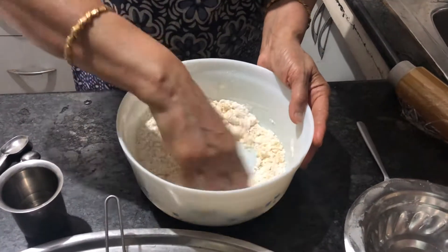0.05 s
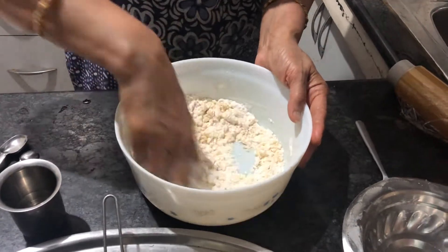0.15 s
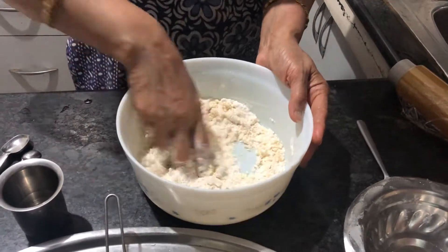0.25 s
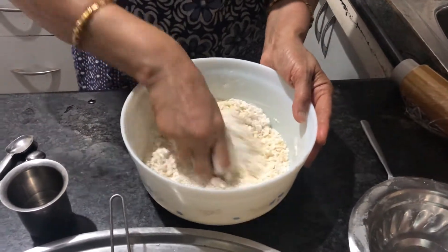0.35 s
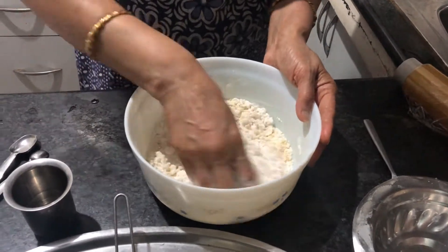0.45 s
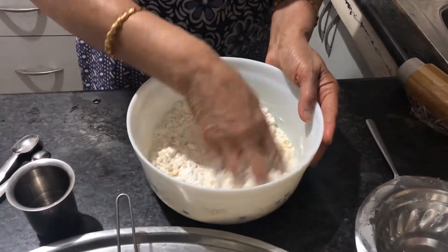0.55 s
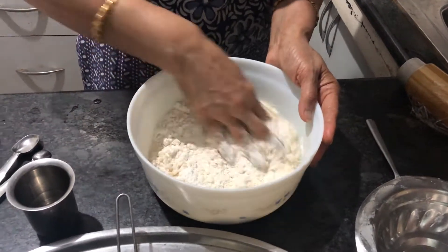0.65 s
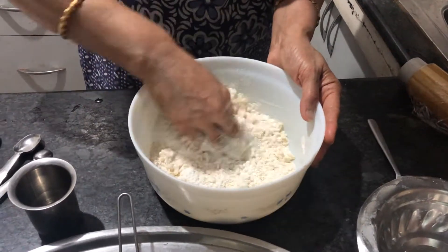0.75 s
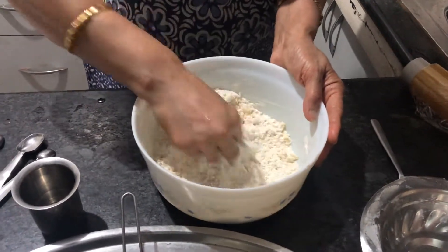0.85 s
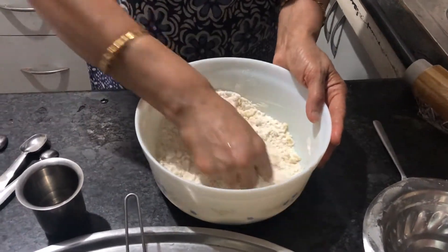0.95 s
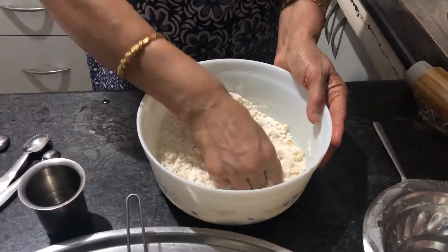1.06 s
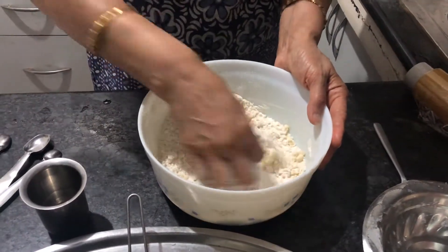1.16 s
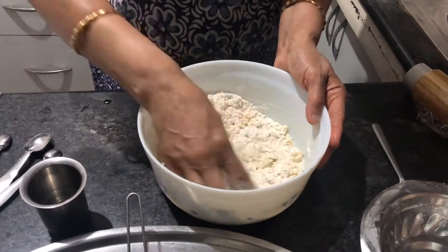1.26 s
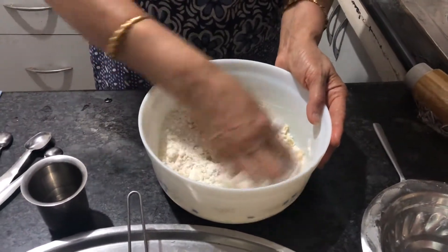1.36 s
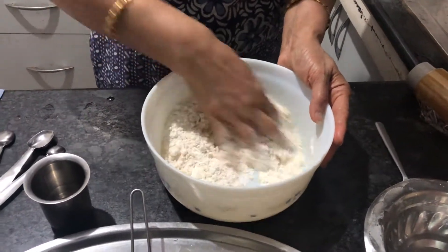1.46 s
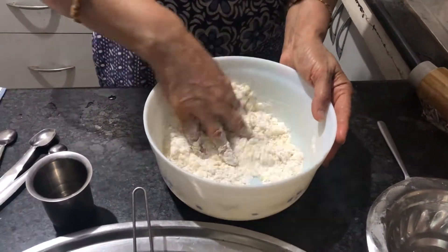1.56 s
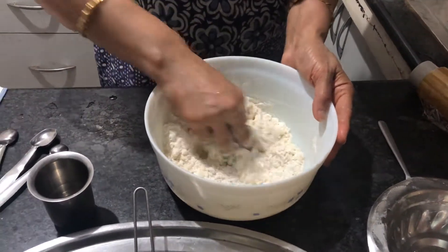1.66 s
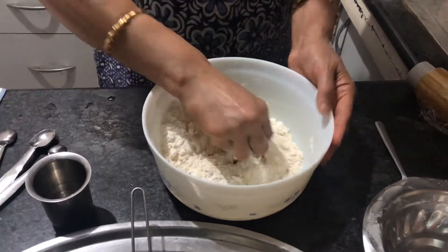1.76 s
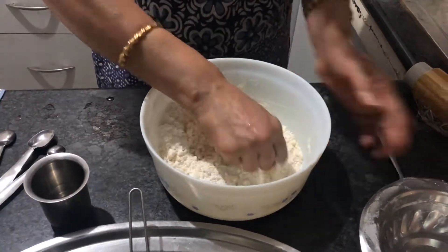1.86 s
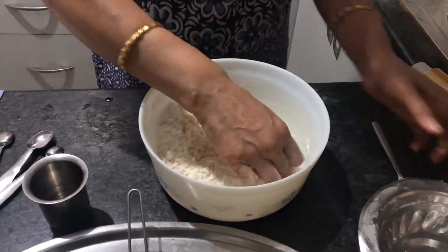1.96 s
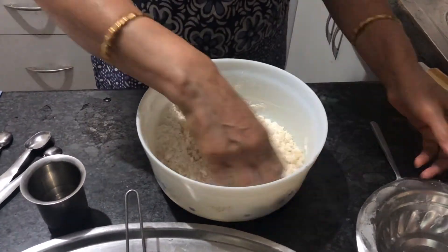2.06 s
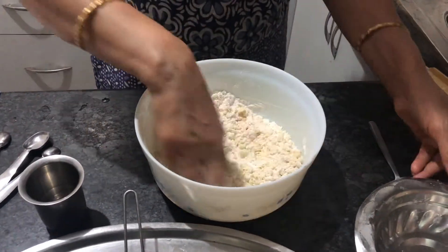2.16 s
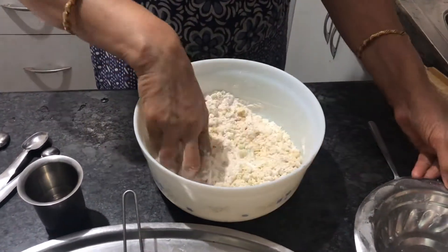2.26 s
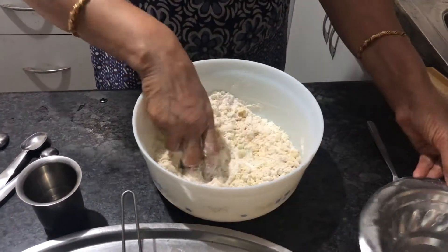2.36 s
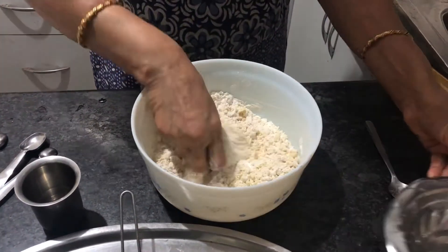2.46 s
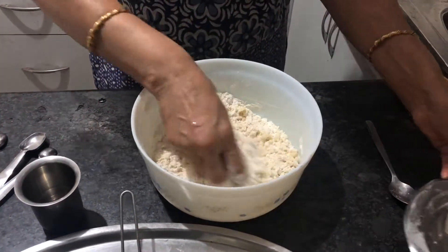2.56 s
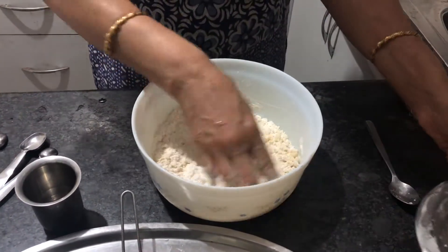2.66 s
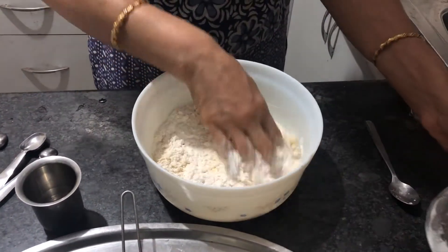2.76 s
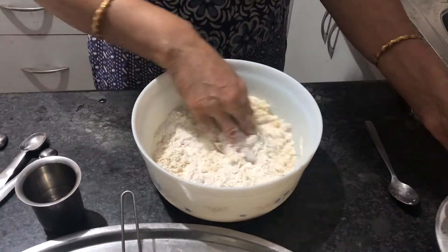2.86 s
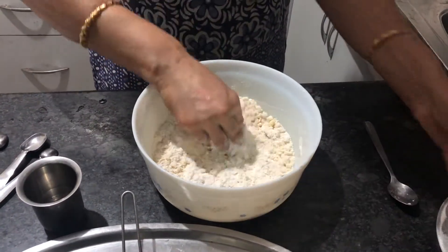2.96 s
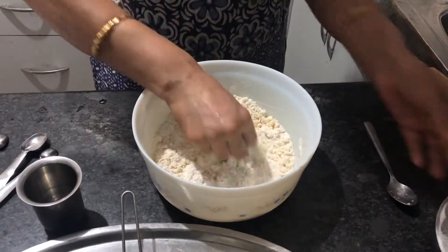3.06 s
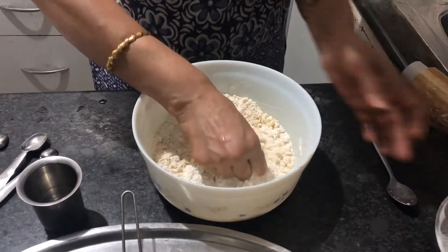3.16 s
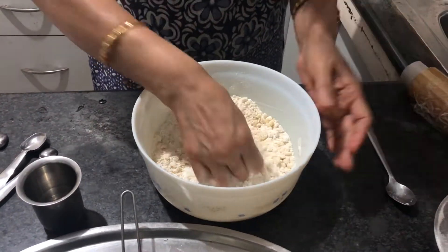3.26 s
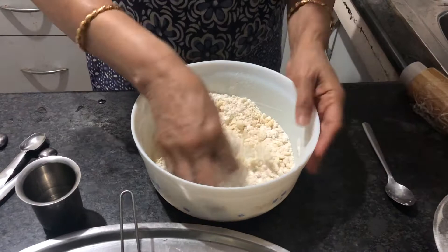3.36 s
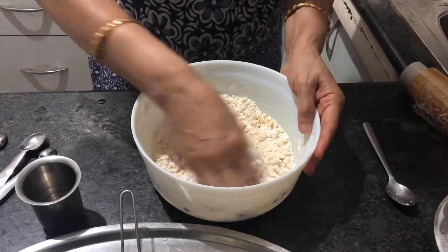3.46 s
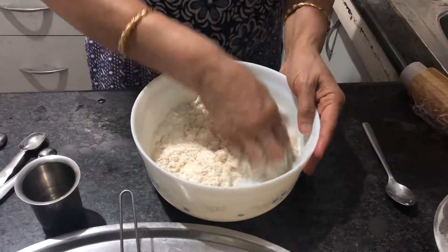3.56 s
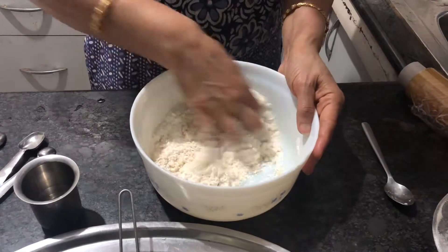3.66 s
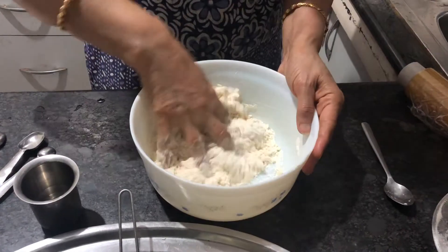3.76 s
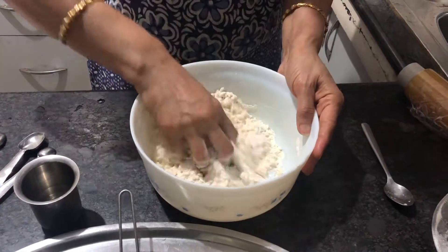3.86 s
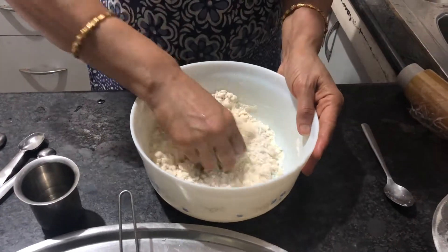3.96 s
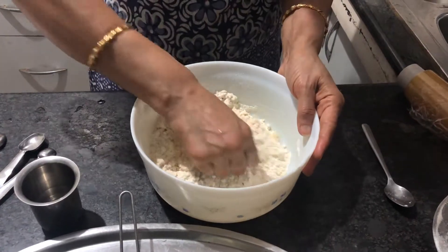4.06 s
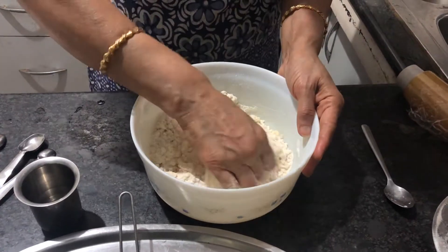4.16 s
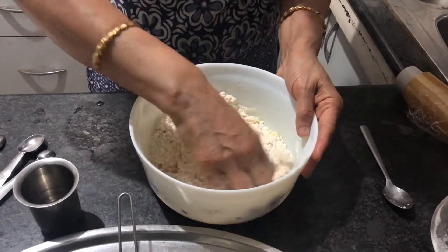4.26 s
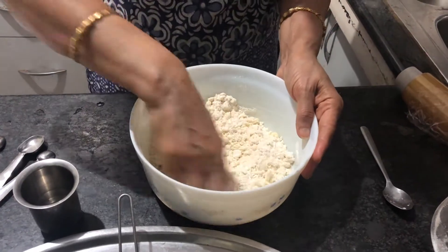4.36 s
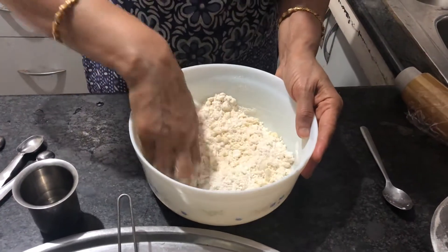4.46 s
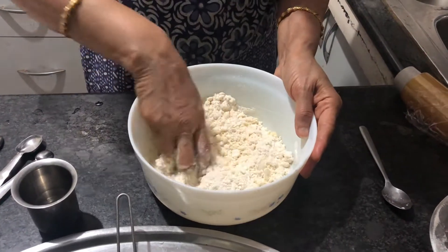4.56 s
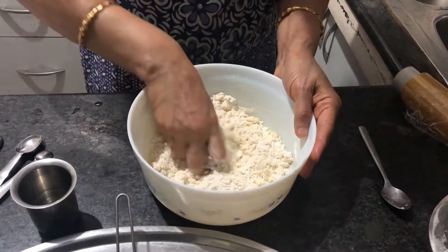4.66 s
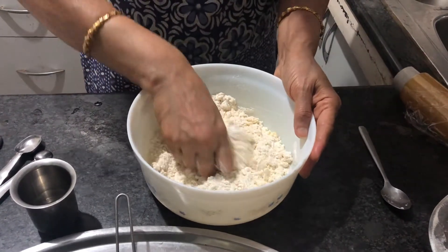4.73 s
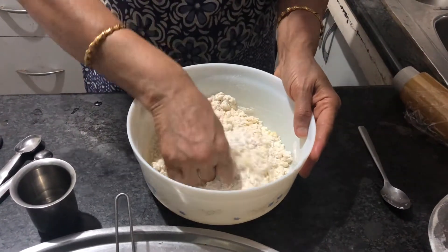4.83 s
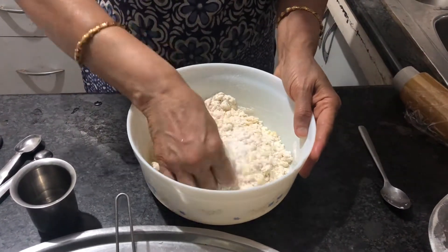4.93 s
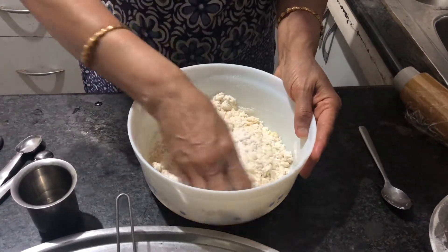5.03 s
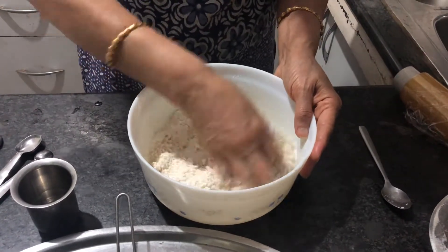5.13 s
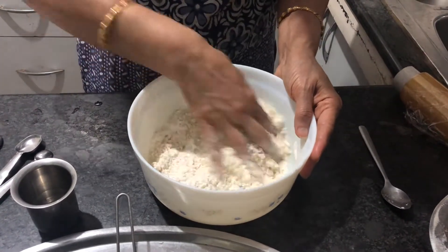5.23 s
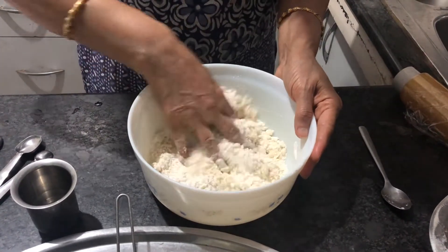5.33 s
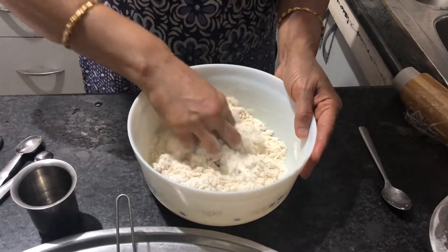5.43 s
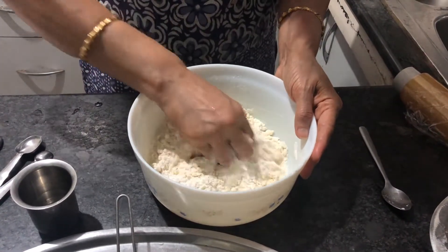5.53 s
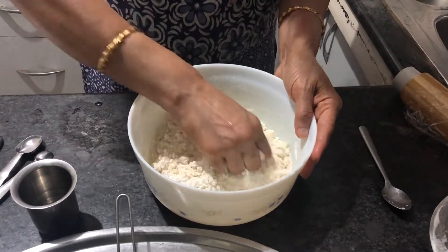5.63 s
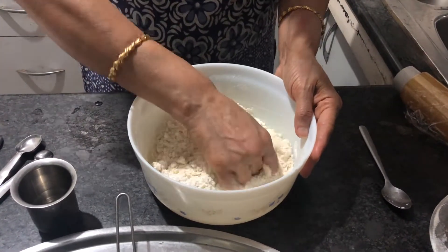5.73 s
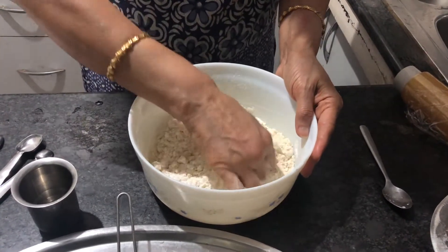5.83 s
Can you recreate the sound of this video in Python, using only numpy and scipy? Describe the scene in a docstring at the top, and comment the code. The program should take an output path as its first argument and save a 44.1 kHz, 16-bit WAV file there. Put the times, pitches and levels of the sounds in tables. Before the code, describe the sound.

Close up in a small hard kitchen, fingers sweep through dry flour and butter crumbs in irregular soft hisses. The ceramic bowl thuds on a stone counter, strongest around 2.4 and 3.4 seconds. Just after two seconds a steel bowl is shoved aside with a bump and ringing scrape. A short gritty squeak comes near 3.9 seconds, over faint fridge hum.

```python
"""Fingers rub butter into flour in a ceramic bowl all the way through: noise grains hiss as powder and crumbs.
Fingernails soon tick the bowl's wall, then its foot starts to knock on the stone: both are ringing resonances.
A little after two seconds a steel bowl is shoved aside: it bumps, grinds, glides and rings by stick and slip.
Later the ceramic foot twice skids on grit with a short squeak, made of grains and resonances.
A fridge hum of wavering tones and soft noise lie under it all, in a small, hard room."""
import sys
import numpy as np
from scipy import signal
from scipy.fft import rfft, irfft, next_fast_len
from scipy.io import wavfile
from scipy.ndimage import map_coordinates

SR = 44100
rng = np.random.default_rng(int(sys.argv[2]) if len(sys.argv) > 2 else 0)


def store_pcm(level_fs):
    """Save levels as 16-bit WAV."""
    pcm = np.round(np.clip(level_fs, -1, 1) * 32767).astype(np.int16)
    wavfile.write(sys.argv[1], SR, np.atleast_2d(pcm).T)


N = 259749  # length in samples
T = np.arange(N) / SR  # time [s]

# Levels in the tables are those of each sound before the room adds its echo.

# sweeps of the fingers through the flour: (start [s], length [s], powder hiss [dB], crumbs [dB])
FINGER_SWEEPS = [(0.0, 0.062, -72, -66), (0.14, 0.25, -76, -74), (0.561, 0.22, -75, -76.5),
                 (0.66, 0.19, -67, -70), (0.883, 0.19, -70.5, -73), (1.208, 0.076, -79, -71.5),
                 (1.331, 0.13, -63, -66.5), (1.54, 0.033, -66, -60.5), (1.677, 0.15, -76, -70.5),
                 (2.014, 0.43, -77, -77.5), (2.993, 0.22, -76, -74), (3.379, 0.1, -74.5, -71),
                 (3.455, 0.2, -64, -61.5), (3.756, 0.18, -64, -61), (4.03, 0.04, -79.5, -80),
                 (4.328, 0.083, -73, -73.5), (4.453, 0.065, -72, -62.5), (4.593, 0.053, -59.5, -58.5),
                 (4.81, .045, -78, -88), (5.082, 0.095, -62.5, -66.5), (5.22, 0.098, -79, -72.5),
                 (5.365, 0.059, -70, -63), (5.453, 0.27, -76.5, -64)]
# tone of the hissing powder: (frequency [Hz], relative level [dB])
POWDER_SPECTRUM = [(6000, -29.5), (8000, -14), (9800, -19), (11200, -8.5), (12200, 2.5), (13200, -0.5),
                   (14200, -3), (15600, -3.5)]
# tone of the breaking crumbs: (frequency [Hz], relative level [dB])
CRUMB_SPECTRUM = [(250, -2.5), (600, 9.5), (1150, -8), (1900, 6.5), (2800, -5.5), (3600, 0), (4300, -4),
                  (5000, -0.5), (5700, 4.5), (6300, -1), (7000, 4.5), (8200, -6), (10000, -14)]
KNEAD_POWDER_DB, KNEAD_CRUMBS_DB = -105, -91.5  # fingertips keep working between sweeps
POWDER_RELEASE_S, CRUMB_RELEASE_S = 0.11, 0.13  # fade after a sweep


def flour():
    """Powder hisses and buttery crumbs break as the fingers sweep through them."""
    powder_power = undb(KNEAD_POWDER_DB) ** 2
    crumb_power = undb(KNEAD_CRUMBS_DB) ** 2
    for start, length, powder_db, crumb_db in FINGER_SWEEPS:
        powder_power = powder_power + (undb(powder_db) * sweep(start, length, POWDER_RELEASE_S)) ** 2
        crumb_power = crumb_power + (undb(crumb_db) * sweep(start, length, CRUMB_RELEASE_S)) ** 2
    # the level of both also flutters at random
    powder = colour(grains(rate=11000, spread_db=3.5), POWDER_SPECTRUM)
    powder = powder * np.sqrt(powder_power) * undb(4.2 * walk(22))
    crumbs = colour(grains(rate=3000, spread_db=-1.5), CRUMB_SPECTRUM)
    crumbs = crumbs * np.sqrt(crumb_power) * undb(1.7 * walk(35))
    wall = undb(-24.5) * excite(crumbs, ring(WALL_MODES))
    rub = shimmer(powder + crumbs + wall, depth_db=5.5, rate=22, band_hz=260)
    return room(rub, wet_db=-8)


SWEEP_ATTACK_S, SWEEP_SAG_DB_PER_S = 0.074, 37


def sweep(start, length, release_s):
    """One sweep swells round its start, sags as the flour gives way, and dies as the crumbs settle."""
    t = T - start
    swell = np.clip(t / SWEEP_ATTACK_S + 0.5, 0, 1)
    sag = undb(-SWEEP_SAG_DB_PER_S * np.clip(t, 0, length))
    fade = np.clip(1 - (t - length) / release_s, 0, 1)
    return (swell * fade) ** 2 * sag


# resonances of the ceramic bowl rocking on its foot: (frequency [Hz], width [Hz], relative level [dB])
FOOT_RESONANCES = [(358, 100, -16), (509, 50, -7), (564, 75, 2.5), (633.4, 32, 3.5), (756.6, 42, 1),
                   (1013, 98, 0.5), (1131, 110, -1), (1254, 230, -1.5)]
# knocks of the foot on the stone: (time [s], peak level [dB], contact cut-off [Hz])
FOOT_KNOCKS = [(1.415, -56.5, 810), (1.724, -47, 793), (2.001, -30, 690), (2.226, -28, 820),
               (2.361, -23, 1260), (2.368, -23.5, 950), (2.876, -57, 760.3), (2.902, -36.5, 752),
               (3.376, -18.5, 1360), (3.382, -19.5, 710), (3.558, -54.5, 784), (4.479, -37, 740),
               (4.489, -36.5, 704), (4.588, -55, 244), (4.886, -42, 480), (4.955, -39.5, 485)]


def knocks():
    """The bowl tips and lands on the counter; a softer landing leaves only the low resonances."""
    out = np.zeros(N)
    foot = butter(ring(FOOT_RESONANCES, swell_s=0.0014), 380, "high", order=4)
    for time_s, db, contact_hz in FOOT_KNOCKS:
        thud = butter(foot, contact_hz, "low", order=8)
        add(out, time_s - 0.002, peak(thud, db))  # starts 2 ms early, as the thud takes time to swell
    return room(out, wet_db=-9.5)


# resonances of the ceramic bowl's wall, which crumbs also ring: (frequency [Hz], width [Hz], relative level [dB])
WALL_MODES = [(1995, 19, -2), (4253, 35, 2), (5600, 160, -10), (6910, 110, -10.5), (7300, 40, -17.5),
              (8100, 88, -16.5), (10500, 61, -23), (13300, 80, -26.5)]
# fingernails on the wall: (time [s], peak level [dB])
NAIL_TICKS = [(.182, -63.5), (1.363, -63.5), (1.572, -56), (1.724, -44.5), (2.224, -38), (3.366, -52),
              (3.557, -48), (3.778, -54.5), (4.482, -58.5), (4.630, -51.5), (4.648, -55), (5.394, -56),
              (5.407, -55)]


def ticks():
    """Fingernails ring the ceramic wall, cushioned by flour."""
    out = np.zeros(N)
    wall = ring(WALL_MODES, swell_s=0.0009)
    for time_s, db in NAIL_TICKS:
        add(out, time_s, peak(wall, db))
    return room(out, wet_db=0.5)


# skids of the ceramic foot on grit: (time of the height [s], level of the push [dB],
# rise [s], fall [s]); rise and fall are exponential time constants
FOOT_SKIDS = [(3.9, -33, 0.0054, 0.0085), (4.667, -53, 0.0033, 0.0049)]
# tone of the crunching grit: (frequency [Hz], relative level [dB])
GRIT_SPECTRUM = [(300, -38), (640, -11), (1150, -27.5), (1650, -1), (1950, -1.5), (2350, -15.5),
                 (2700, -10.5), (3600, -44), (5700, -8.5), (6400, -18), (7100, -13), (9500, -29),
                 (12000, -24), (15600, -23)]
# resonances of the foot's brief squeak: (frequency [Hz], width [Hz], relative level [dB])
SQUEAK_RESONANCES = [(1709, 22, -8), (1917, 36, -5.5), (2021, 73, -7)]


def skids():
    """Grit crunches under the foot of the bowl and sets off a short squeak."""
    push = np.zeros(N)
    for height_s, db, rise_s, fall_s in FOOT_SKIDS:
        push += undb(db) * np.exp(-np.maximum((height_s - T) / rise_s, (T - height_s) / fall_s))
    crunch = push * colour(grains(rate=10000, spread_db=1), GRIT_SPECTRUM)
    squeak = undb(-11) * excite(crunch, ring(SQUEAK_RESONANCES))
    rough = shimmer(undb(-1.5) * crunch, depth_db=2, rate=30, band_hz=420)
    return room(rough + squeak, wet_db=-8.5)


# resonances of the steel bowl: (frequency [Hz], width [Hz], then relative levels:
# biting into the stone [dB], gliding [dB], ringing free [dB])
STEEL_RESONANCES = [(520.6, 31, -9, -28.5, -11.5), (622, 55, -16, -25.5, -12.5), (742, 79, -9, -28, -1.5),
                    (1038.4, 55, 2, -18.5, -36), (1073.6, 42.7, -11, -6.5, -36),
                    (1234, 67, -13.5, -32, -6.5), (1625, 34, -20, -5.5, -3.5), (1739, 38, -3.5, -0.5, -20),
                    (1965, 85, -8.5, -27, -21.5), (2378, 100, -17.5, -24.5, -29.5),
                    (2792, 14, -6, -46, -37.5), (3312, 65, -15.5, -11.5, -18.5), (3965, 16, -19, -20.5, -4),
                    (4254, 26, -11.5, -7, -21.5), (4553, 150, -11.5, -11, -17.5), (5053, 40, -4, -18, -7.5),
                    (5630, 28, -10, -12.5, -13.5), (5780, 140, -19.5, -15.5, -24.5),
                    (6345, 30, -14.5, -21, -43), (6770, 34, -26, -33, -46.5), (7350, 37, -23.5, -18, -36.5),
                    (7780, 300, -21.5, -28.5, -38.5), (8270, 61, -14, -33, -36.5),
                    (9230, 200, -25.5, -23, -50), (10140, 96, -22, -27, -43.5), (10120, 13, -9, -39, -47),
                    (11020, 100, -23, -22, -43.5), (12800, 890, -30.5, -32.5, -48.5),
                    (13930, 40, -21.5, -31, -42.5), (16400, 66, -3, -31.5, -39)]
# shove of the steel bowl: (time [s], level of the force [dB], weight on the stone [0-1])
STEEL_SHOVE = [(2.22, -60, .3), (2.255, -41, .2), (2.312, -54.5, .2), (2.335, -39.5, .2),
               (2.353, -38.5, .2), (2.362, -20.5, 0.99), (2.398, -28, 1), (2.42, -20.5, 1),
               (2.485, -25, .85), (2.535, -33, 0.62), (2.6, -35.5, .5), (2.68, -47, 0.33),
               (2.75, -34, 0.14), (2.81, -36, .1), (2.9, -50, 0.08), (2.94, -59, 0.45)]
# bumps of the steel bowl as it starts and stops: (time [s], peak level before the bass cut [dB], bite [0-1])
STEEL_BUMPS = [(2.355, -18.5, 0.78), (2.360, -13.5, 0.73), (2.873, -25, 0.32), (2.917, -36, 0.01)]
# fingernails touch the steel rim: (time [s], peak level before the bass cut [dB], ring [Hz], width [Hz])
RIM_TOUCHES = [(2.207, -47, 5040, 27.9), (2.26, -52, 4177, 70.8)]
BITE_POWER = 4.5  # the base only digs in under nearly full weight
# gain of the glide's low resonances: with no weight, how much full weight would add, and the highest gain
BODY_LIGHT_DB, BODY_WEIGHT_DB, BODY_MAX_DB = -15, 51.5, 5.5


def steel_bowl():
    """The shoved bowl grinds under full weight, glides as it is eased, and bumps as it starts and stops."""
    db, weight = curves(STEEL_SHOVE)
    weight = np.clip(weight, 0, 1)
    bite = weight ** BITE_POWER
    moving = (T > STEEL_SHOVE[0][0]) * (T < STEEL_SHOVE[-1][0])
    force = stick_slip(db, weight, bite) * moving
    hz, width, biting_db, gliding_db, free_db = np.transpose(STEEL_RESONANCES)
    grind = excite(force * np.sqrt(bite), steep_ring(hz, width, biting_db))
    rasp = undb(-25.5) * butter(force * bite, 7000, "low", order=1)
    hiss = undb(-12.5) * butter(force, 12500, "high", order=8)
    glide = excite(force * np.sqrt(1 - bite), steep_ring(hz, width, gliding_db))
    # filtered forwards, then backwards, so the low part stays in step with the glide
    body = butter(glide, 1380, "low", order=6)
    body = butter(body[::-1], 1380, "low", order=6)[::-1]
    body_db = np.minimum(BODY_LIGHT_DB + BODY_WEIGHT_DB * weight, BODY_MAX_DB)
    glide = glide + (undb(body_db) - 1) * body
    # the point of contact wanders round the base: it bends the pitch and favours now one mode, now another
    speed_change = (0.007 - 0.005 * bite) * walk(18) * moving
    bent_time = T + np.cumsum(speed_change) / SR
    scrape = np.interp(bent_time, T, grind + glide + rasp + hiss)
    out = shimmer(scrape, depth_db=3, rate=22, band_hz=220)
    for time_s, bump_db, held in STEEL_BUMPS:
        modes_db = free_db + np.clip(held, 0, 1) * (biting_db - free_db)
        add(out, time_s, peak(steep_ring(hz, width, modes_db), bump_db))
    for time_s, tap_db, tap_hz, tap_width in RIM_TOUCHES:
        add(out, time_s, peak(ring([(tap_hz, tap_width, 0)], swell_s=0.003), tap_db))
    return room(butter(out, 470, "high", order=4), wet_db=-8)


GLIDE_SLIP_HZ, BITE_SLIP_HZ = 88.5, 257.4  # slips a second with no weight and with full weight, before jitter
TREBLE_HZ = 3500  # a light contact brightens the scrape above this
TREBLE_LOUD_DB, TREBLE_SLOPE = -2.5, 0.43  # treble against the rest at the hardest push; dB more per dB softer


def stick_slip(db, weight, bite):
    """Each slip under the steel is a jolt and a burst of grit; faster with weight, brighter when soft."""
    slip_hz = GLIDE_SLIP_HZ + (BITE_SLIP_HZ - GLIDE_SLIP_HZ) * weight
    jitter = np.exp((0.03 + 0.3 * bite) * walk(150))
    phase = np.cumsum(slip_hz * jitter) / SR  # counts slips
    slips = np.diff(np.floor(phase), prepend=0)
    jolts = unit(slips / np.sqrt(slip_hz) * undb(2 * walk(200)))
    grit = unit(grains(rate=9000, spread_db=0.5) * np.exp(-(phase % 1) / 0.55))  # fades after each slip
    force = unit(0.31 * jolts + grit) * undb(db)
    treble = undb(TREBLE_LOUD_DB + TREBLE_SLOPE * (db.max() - db))
    low = butter(force, TREBLE_HZ, "low", order=1)
    # the division holds the level roughly steady as the treble changes
    return (low + treble * (force - low)) / np.sqrt(1.5 + 0.72 * treble ** 2)


# steady tones of the fridge: (frequency [Hz], level before wavering [dB])
FRIDGE_TONES = [(91.5, -87), (149, -85.5), (167.2, -70), (193.8, -80), (242.2, -92), (339.1, -86.5)]
# tone of the room noise: (frequency [Hz], relative level per Hz [dB])
AIR_SPECTRUM = [(50, -36), (90, -22.5), (120, -13.5), (170, -13), (250, -14.5), (480, -12), (780, -12),
                (1150, -30.5), (1700, -15), (2400, -18.5), (2700, -27), (4000, -28), (9900, -52.5),
                (15500, -42.5)]
AIR_DB = -71


def kitchen():
    """A fridge hum of tones wavering in level and phase, over soft room noise."""
    hum = np.zeros(N)
    for hz, db in FRIDGE_TONES:
        level = undb(db + 4.5 * walk(13)) * np.sqrt(2)
        hum += level * np.sin(2 * np.pi * hz * T + 0.4 * walk(12))
    air = shimmer(colour(rng.standard_normal(N), AIR_SPECTRUM), depth_db=3.1, rate=23, band_hz=200)
    return hum + undb(AIR_DB) * air


ROOM_T60_S, ROOM_TREBLE_T60_S = 0.23, 0.1  # time to fall by 60 dB, below and above 2000 Hz


def room(x, wet_db):
    """Direct sound plus the short wash of tiles and cupboards, whose treble dies sooner."""
    t = T[:SR // 2]
    wash = rng.standard_normal(len(t)) * np.clip((t - 0.005) / 0.0028, 0, 1)
    low = butter(wash, 2000, "low")
    tail = low * undb(-60 * t / ROOM_T60_S) + (wash - low) * undb(-60 * t / ROOM_TREBLE_T60_S)
    return x + undb(wet_db) * excite(x, tail)


def shimmer(x, depth_db, rate, band_hz):
    """Moving contacts and reflections: neighbouring bands swell and fade on their own."""
    f, t, z = signal.stft(x, SR, nperseg=512)
    field = rng.standard_normal((256, 512))
    where = np.meshgrid(f / band_hz, t * rate, indexing="ij")
    swell = map_coordinates(field, where, order=1, mode="wrap")
    gain = undb(1.5 * depth_db * swell)  # 1.5 makes up for the spread lost by blending the field
    return signal.istft(z * gain / np.sqrt(np.mean(gain ** 2)), SR, nperseg=512)[1][:N]


def ring(modes, swell_s=0.):
    """Resonances (Hz, width Hz, peak dB) set off by one tap; a soft contact takes a moment to swell."""
    t = T[:SR // 2]
    onset = 1 - np.exp(-t / max(swell_s, 1 / SR))
    tones = sum(undb(db) * width * np.exp(-np.pi * width * t) * np.cos(2 * np.pi * hz * t)
                for hz, width, db in modes)
    return onset * tones


def steep_ring(hz, width, db):
    """Each resonance applied twice: narrow bands with dark valleys between them."""
    t = T[:SR // 2]
    # 1.55 keeps the doubled resonance as wide as its setting says
    return sum(undb(d) * w ** 2 * t * np.exp(-1.55 * np.pi * w * t) * np.cos(2 * np.pi * f * t)
               for f, w, d in zip(hz, width, db))


def excite(force, response):
    """Drive a response, scaled to unit energy, with a force."""
    return signal.fftconvolve(force, response / np.linalg.norm(response))[:N]


def grains(rate, spread_db):
    """Tiny clicks of uneven size at random moments, about `rate` a second; rms 1."""
    sizes = undb(spread_db * np.minimum(rng.exponential(size=N), 5))
    return unit((rng.random(N) < rate / SR) * sizes * rng.standard_normal(N))


def walk(rate):
    """Random wander of spread a little under 1: straight lines between `rate` random values a second."""
    knots = rng.standard_normal(4096)
    return np.interp(T * rate, np.arange(len(knots)), knots)


def colour(x, points):
    """Filter by a spectrum of (Hz, dB) points; rms 1."""
    hz, db = np.transpose(points)
    size = next_fast_len(len(x))
    f = np.arange(size // 2 + 1) * SR / size + 1  # 1 Hz up, to avoid log(0)
    skirt = np.minimum(f / hz[0], 1) ** 2  # fades out below the first point
    gain = skirt * undb(np.interp(np.log(f), np.log(hz), db))
    return unit(irfft(rfft(x, size) * gain, size)[:len(x)])


def butter(x, hz, kind, order=2):
    """Low-pass or high-pass."""
    return signal.sosfilt(signal.butter(order, min(hz, SR / 2 - 1), kind, fs=SR, output="sos"), x)


def curves(rows):
    """Each column of a table after the time, joined by straight lines in time."""
    time_s, *columns = np.transpose(rows)
    return [np.interp(T, time_s, column) for column in columns]


def add(track, time_s, sound):
    """Mix a sound in at a time in seconds."""
    i = max(int(time_s * SR), 0)
    track[i:i + len(sound)] += sound[:N - i]


def peak(x, db):
    """Scale to a peak level."""
    return x * undb(db) / np.abs(x).max()


def unit(x):
    """Scale to rms 1."""
    return x / np.sqrt(np.mean(x ** 2) + 1e-24)


def undb(db):
    """Decibels to gain."""
    return 10 ** (np.asarray(db) / 20)


def scene():
    """Everything on the counter, heard from just above it."""
    return (flour() + knocks() + ticks() + skids() + steel_bowl() + kitchen())[None]


def record(dry):
    """The microphone drops the deep bass and the very top."""
    top = signal.ellip(10, 0.1, 80, 15750, fs=SR, output="sos")  # steep low-pass at 15750 Hz
    return signal.sosfilt(top, butter(dry, 58, "high"))


dry = scene()
out = record(dry)
store_pcm(out)
```